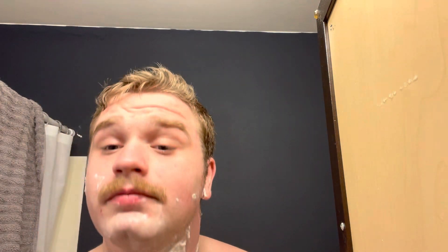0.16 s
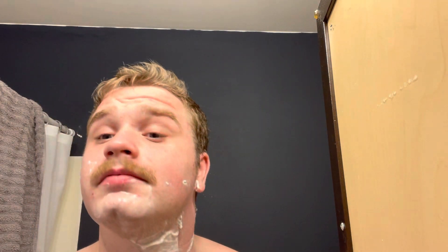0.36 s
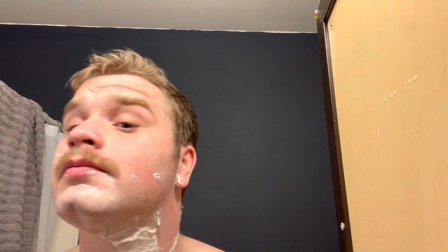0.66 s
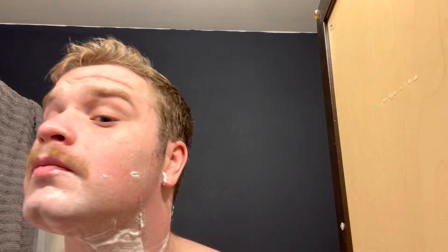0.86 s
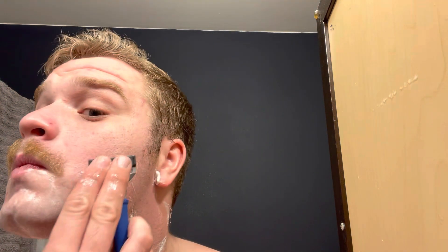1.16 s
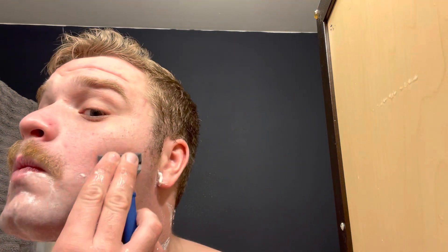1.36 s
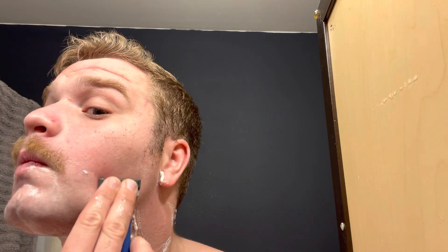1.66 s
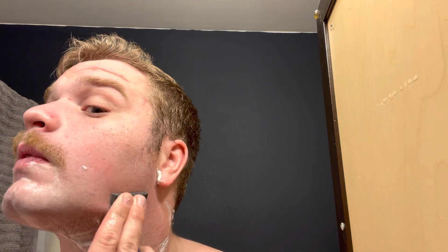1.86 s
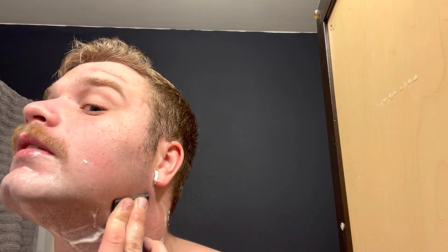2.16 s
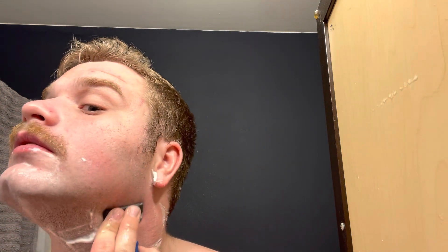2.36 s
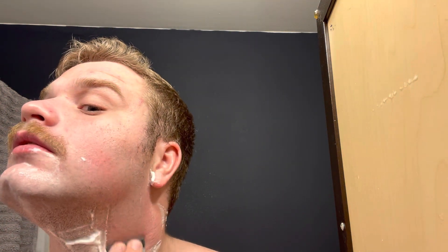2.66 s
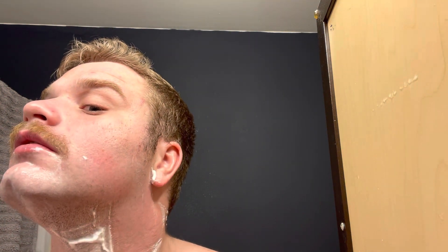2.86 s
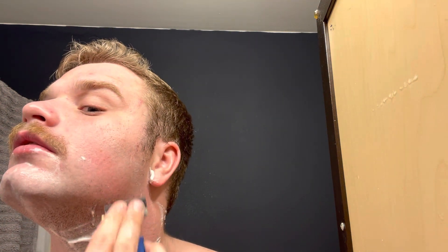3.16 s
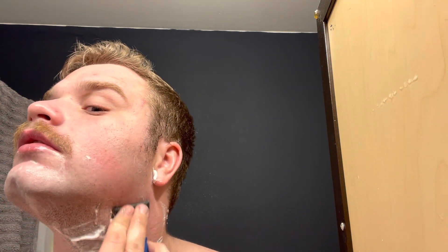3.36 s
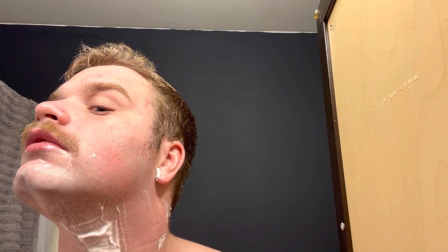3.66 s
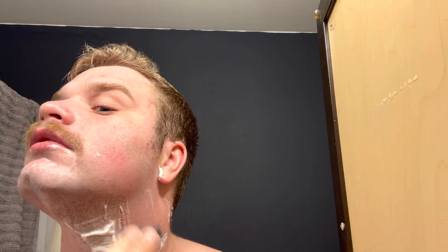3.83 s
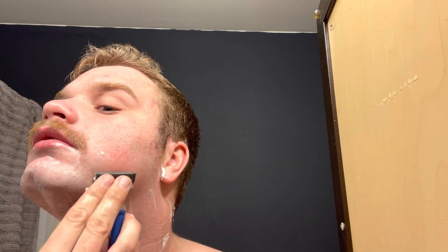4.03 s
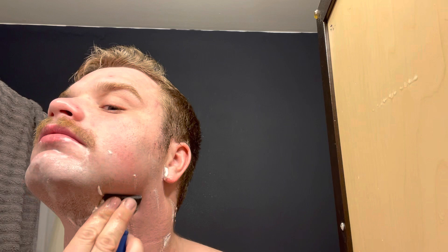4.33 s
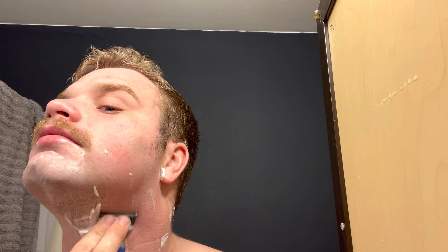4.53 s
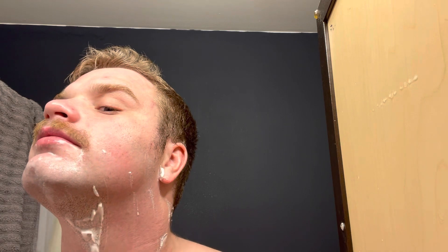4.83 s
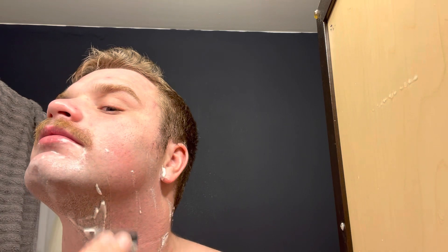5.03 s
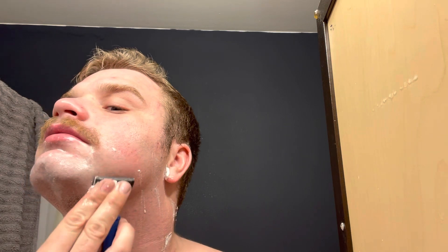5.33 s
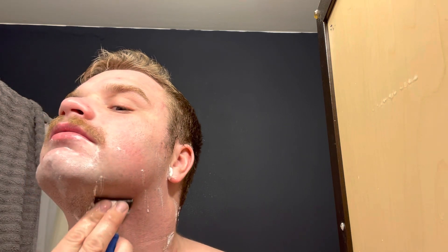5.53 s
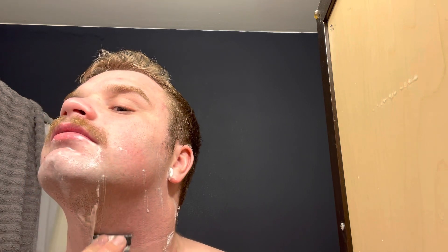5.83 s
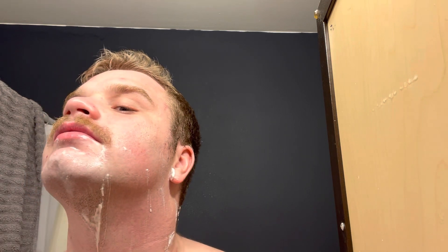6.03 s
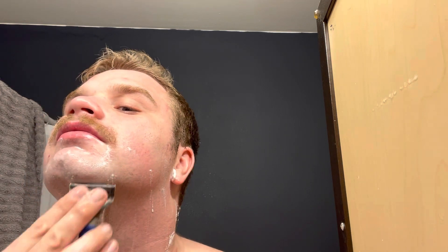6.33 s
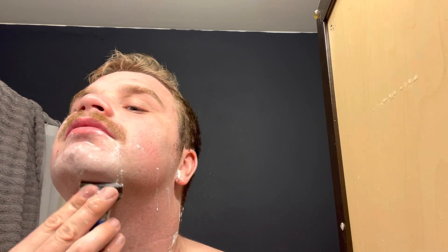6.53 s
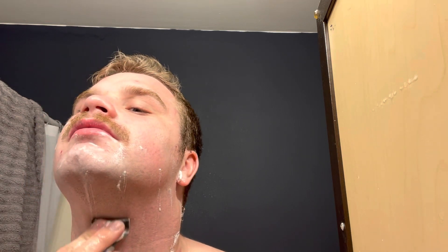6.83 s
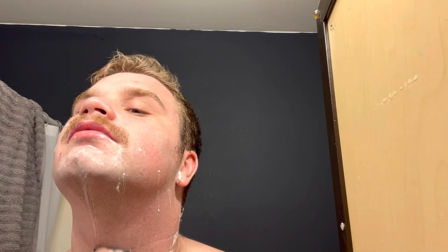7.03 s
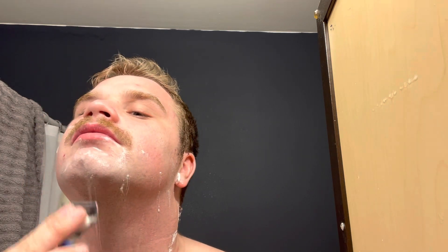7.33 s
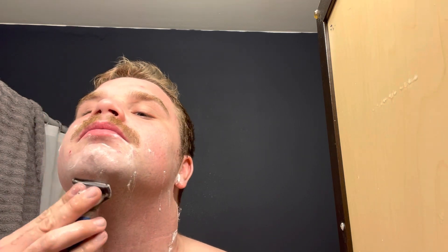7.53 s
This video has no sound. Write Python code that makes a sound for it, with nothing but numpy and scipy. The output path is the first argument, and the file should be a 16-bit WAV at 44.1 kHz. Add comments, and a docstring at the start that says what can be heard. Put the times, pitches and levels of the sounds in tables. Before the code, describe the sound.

An extractor fan hums low and steady in a small bathroom. Shaving foam fizzes and ticks very faintly, then a hand razor makes seven separate strokes through stubble, each a crisp crackle with skin drag and a wet squelch of lather. Tiny clicks come now and then. Near the end, soft hand bumps and two dull, deep thumps precede one short last stroke. The microphone is close and stereo.

```python
"""Wet shave in a small bathroom, close stereo microphone; an extractor fan hums throughout.
First, fresh foam fizzes and ticks. From 1.4 s, seven razor strokes: hairs snap in a dense crackle,
the head drags on the skin, lather squelches; foam and cartridge tick now and then.
The blades zing in the fourth stroke; near 6 s the head flicks off the skin and rings.
Soft hand bumps follow from 6.6 s, then two dull arm thumps before the short last stroke."""
import sys
import numpy as np
from scipy import signal
from scipy.fft import rfft, irfft, next_fast_len
from scipy.io import wavfile

SR = 44100
rng = np.random.default_rng(int(sys.argv[2]) if len(sys.argv) > 2 else 0)


def master(y):
    """Save y as 16-bit WAV."""
    cut = np.clip(np.atleast_2d(y).T, -1, 1)
    pcm = np.round(cut * 32767)  # scale
    wavfile.write(sys.argv[1], SR, pcm.astype(np.int16))


N = 339129
TIME_S = np.arange(N) / SR
N_FFT = next_fast_len(N + SR)
FREQS_HZ = np.maximum(np.arange(N_FFT // 2 + 1) * SR / N_FFT, 1)
FIELDS = 3  # sound fields: shared, left only, right only


def razor(fine_db=-1.0, coarse_db=-3.0, drag_db=6.5, lather_db=-0.5, judder_db=1.9, judder_hz=85):
    """Blades cut fine and coarse hairs; the head catches and slips, shaking all contacts together."""
    # spectra of stubble, coarse hairs, skin drag and wet lather: freq_hz, density_db
    fine_spectrum = [(2500, -16), (3700, -15), (4300, 1), (5400, 0), (6500, -1.5), (7500, 1.5), (9000, -8),
                     (12000, -10)]
    coarse_spectrum = [(1600, -15.5), (1950, -8), (2250, -6.5), (2550, 3.5), (2950, -2.5), (3400, -1.5),
                       (3900, -4.5), (5500, -7), (9000, -37.5)]
    drag_spectrum = [(130, -17), (260, -11), (500, -1), (780, 0), (1120, -2), (1380, -7), (1700, -7.5),
                     (2400, -21)]
    lather_spectrum = [(5000, -7), (7000, -6), (8800, -10.5), (10500, 2.5), (12500, -5.5), (15000, -16)]
    fine, coarse, drag, lather = stroke_gains()
    lather = np.maximum(lather, settling(lather))
    cutting = from_db(fine_db) * fine * colour(snaps(per_s=4200, spread_db=4), fine_spectrum)
    tugging = from_db(coarse_db) * coarse * colour(snaps(per_s=1400, spread_db=3), coarse_spectrum)
    rubbing = from_db(drag_db) * drag * colour(snaps(per_s=4000, spread_db=0.5), drag_spectrum)
    squelch = from_db(lather_db) * lather * colour(snaps(per_s=4100, spread_db=3), lather_spectrum)
    contacts = cutting + tugging + rubbing + squelch + zing()
    judder = unit_rms(resonate(drift(2 * judder_hz), judder_hz, judder_hz))
    return contacts * from_db(judder_db * judder)


def stroke_gains(touch_db=-23, rest_db=-21.5, land_db_per_s=87.5, lift_db_per_s=480, heap_db=7):
    """Gains of fine hairs, coarse hairs, drag and lather as the head lands, rests, pulls and lifts."""
    # razor strokes, coarse and drag relative to fine stubble: start_s, lift_s, attack_s,
    # fine_start_db, fine_lift_db, coarse_db, drag_start_db, drag_lift_db, wet_db, rest_s
    strokes = [(1.438, 1.888, 0.032, -68.5, -76.5, 0.5, -16.5, 4, 0, .06),
               (1.983, 2.808, 0.1, -70, -50.5, 1.5, -8, -10, 1.5, .1),
               (3.298, 3.636, 0.069, -61, -54, -7, -10.5, 0.5, -2, 0.049),
               (4.178, 4.825, 0.072, -59.5, -49, -4.5, -10.5, -7, -6, 0.062),
               (5.387, 6.008, 0.061, -57, -65, -9.5, -5, 4, 0.5, 0.14),
               (6.542, 7.081, 0.061, -50, -65.5, -6.5, -5, -1.5, -2.5, 0.23),
               (7.585, 7.733, 0.067, -52.5, -54.5, -9.5, -9, -7.5, -1, 0.11)]
    # dense stubble where the blades bite harder: time_s, rise_db, half_length_s
    patches = [(1.489, 11.5, 0.11), (1.807, 7.5, 0.05), (2.012, 7, 0.035), (2.191, 13, 0.024),
               (2.51, 8, 0.064), (2.666, 6.5, .06), (3.313, 11, 0.01), (3.408, 5, 0.032), (3.553, 3.5, .03),
               (3.634, 5, 0.0061), (4.287, 9, 0.044), (4.832, 6.5, 0.0094), (5.426, 4.5, 0.022),
               (5.966, 20, 0.036), (6.653, 4, .04), (7.016, 7, 0.055)]
    bite_db = sum(rise_db * bell(time_s, half_s) for time_s, rise_db, half_s in patches)
    gains = np.zeros((4, N))
    for start_s, lift_s, attack_s, *levels_db, rest_s in strokes:
        fine_start_db, fine_lift_db, coarse_db, drag_start_db, drag_lift_db, wet_db = levels_db
        along = np.clip((TIME_S - start_s) / (lift_s - start_s), 0, 1)
        pull_db = np.maximum(touch_db * np.maximum(start_s - TIME_S, 0) / attack_s, rest_db)
        off_skin_db = land_db_per_s * np.maximum(start_s - rest_s - TIME_S, 0)
        off_skin_db += lift_db_per_s * np.maximum(TIME_S - lift_s, 0)
        pressure_db = pull_db - off_skin_db + fine_start_db + along * (fine_lift_db - fine_start_db)
        fine_db = pressure_db + bite_db
        drag_db = pressure_db + 0.57 * bite_db + drag_start_db + along * (drag_lift_db - drag_start_db)
        # lather is torn by both cut and drag, and heaps up ahead of the blades
        lather_db = (fine_db + drag_db) / 2 + wet_db + heap_db * (along - 0.5)
        on = off_skin_db < 60
        gains[:, on] += from_db([fine_db[on], fine_db[on] + coarse_db, drag_db[on], lather_db[on]])
    return gains


def settling(lather, stirred_db=-18.5, fall_db_per_s=74):
    """Gain of stirred lather, crackling on after the head has passed."""
    fall_db = fall_db_per_s * TIME_S
    held_db = np.maximum.accumulate(20 * np.log10(lather + 1e-9) + fall_db) - fall_db
    return from_db(held_db + stirred_db)


def razor_head(x, gain_db=-1.13, sway_db=2.2, sway_hz=2):
    """The hollow cartridge rings and swallows pitches in between; each mode sways as the head tilts."""
    # dips between modes: freq_hz, width_hz, depth_db
    hollows = [(1570, 250, -5), (2520, 160, -6), (3520, 120, -3)]
    # cartridge modes: freq_hz, width_hz, gain_db
    modes = [(2110, 120, 5), (2320, 110, 7.5), (2800, 170, 2), (2990, 150, 0.5), (3720, 140, 0),
             (4720, 130, -3), (5300, 150, 1.5), (5700, 160, -4), (6250, 300, -4), (8200, 300, -1)]
    for hz, width_hz, db in hollows:
        x = x - (1 - from_db(db)) * resonate(x, hz, width_hz)
    rings = sum(from_db(db + sway_db * drift(sway_hz)) * resonate(x, hz, width_hz)
                for hz, width_hz, db in modes)
    return from_db(gain_db) * (x + rings)


def thick_hairs(gain_db=1.5, ring_hz=3500, width_hz=2400):
    """Single thick hairs give way, each a sharp click with the broad colour of the head."""
    # hair snaps: time_s, level_db
    hairs = [(2.5128, -32), (2.6825, -25), (2.699, -25), (2.7289, -23), (2.7328, -23), (4.2447, -40),
             (4.4109, -39), (4.564, -35), (4.8342, -34), (6.565, -35), (6.608, -33), (6.666, -34)]
    clicks = np.zeros((FIELDS, N))
    for time_s, db in hairs:
        clicks[:, round(time_s * SR)] = from_db(db + gain_db) * rng.choice([-1, 1], FIELDS)
    click_peak = resonate(signal.unit_impulse(SR // 100), ring_hz, width_hz).max()
    return resonate(clicks, ring_hz, width_hz) / click_peak


def zing(start_s=4.25, length_s=0.41, edge_s=0.023, level_db=-57, ring_hz=6850, width_hz=900):
    """The blades ring on the long stroke down the neck."""
    end_s = start_s + length_s
    gate = np.interp(TIME_S, [start_s - edge_s, start_s, end_s, end_s + edge_s], [0, 1, 1, 0])
    ring = resonate(snaps(per_s=2700, spread_db=3), ring_hz, width_hz)
    return from_db(level_db) * gate * unit_rms(ring)


def flick(time_s=5.968, half_length_s=0.02, level_db=-49.5, modes_hz=(2320, 3700, 6150), width_hz=140):
    """Leaving the skin, the cartridge is undamped and the last hairs set it ringing."""
    hairs = snaps(per_s=3600, spread_db=6)
    ring = sum(resonate(hairs, hz, width_hz) for hz in modes_hz)
    return from_db(level_db) * bell(time_s, half_length_s) * unit_rms(ring)


def ticks():
    """Foam and cartridge tick finely; a light touch of the blades is a duller, wider click."""
    # foam and cartridge ticks: time_s, peak_db, ring_hz, width_hz
    fine_ticks = [(0.155, -52.5, 5270, 1520), (0.323, -51, 5280, 1200), (0.442, -47, 11050, 1400),
                  (0.52, -50.5, 7030, 500), (0.673, -53, 6900, 2000), (1.352, -50.5, 4950, 2200),
                  (2.363, -33.5, 8440, 3500), (3.085, -47, 10900, 3000), (4.194, -45, 11100, 1500),
                  (4.774, -28.5, 9100, 3500), (5.812, -38, 8300, 3500), (6.246, -48, 8500, 3000),
                  (6.43, -26.5, 9100, 3500), (6.938, -33.5, 7800, 3500)]
    # blades touching skin between strokes: time_s, peak_db, ring_hz
    touches = [(0.635, -53, 1300), (3.217, -61, 2400), (4.016, -58, 4500), (5.208, -53, 6000),
               (5.278, -55, 3300), (5.324, -58, 4000), (7.127, -53, 3800)]
    out = np.zeros((FIELDS, N))
    for time_s, db, hz, width_hz in fine_ticks:
        add_at(out, time_s, from_db(db) * crack(hz, width_hz, decay_s=0.0015))
    for time_s, db, hz in touches:
        add_at(out, time_s, from_db(db) * crack(hz, width_hz=3500, decay_s=0.0014))
    return out


def crack(hz, width_hz, decay_s):
    """A short noise burst through one broad ring; peak 1."""
    age_s = TIME_S[:SR // 50]
    burst = rng.standard_normal((FIELDS, len(age_s))) * np.exp(-age_s / decay_s)
    ring = resonate(resonate(burst, hz, width_hz), hz, max(hz, width_hz))
    return ring / np.abs(ring).max()


def foam(floor_db=-83.5, fresh_db=12, fresh_s=1.45, clump_db=1.8, clump_hz=5):
    """Tiny bubbles burst in clumps, most while the foam is fresh."""
    # bubble fizz: freq_hz, density_db
    spectrum = [(1200, -9), (2500, -6), (6500, -5), (8800, -8), (11000, 0), (13500, -3)]
    level_db = floor_db + fresh_db * bell(0, fresh_s) + clump_db * drift(clump_hz)
    return from_db(level_db) * colour(snaps(per_s=3000, spread_db=2.5), spectrum)


def hand_bumps(rise_s=0.0024, relative_width=0.85):
    """Flesh meets something firm: a soft puff that swells and dies."""
    # bumps and brushes of the hand: time_s, level_db, centre_hz, length_s
    bumps = [(6.625, -48, 260, 0.1), (6.918, -42.5, 245, 0.022), (7.366, -61.5, 600, 0.19),
             (7.433, -46, 520, 0.027), (7.435, -59, 5500, 0.025)]
    out = np.zeros((FIELDS, N))
    age_s = TIME_S[:SR // 5]
    for time_s, db, hz, length_s in bumps:
        noise = rng.standard_normal((FIELDS, len(age_s)))
        thud = resonate(resonate(noise, hz, hz * relative_width), hz, 2 * hz)
        swell = (1 - np.exp(-age_s / rise_s)) * np.exp(-(age_s / length_s) ** 2 / 2)
        add_at(out, time_s, from_db(db) * unit_rms(thud) * swell)
    return out


def arm_thumps(centre_hz=36.2):
    """The arm pushes the air once and it swings back; mono."""
    # pushes of air: time_s, peak_db
    thumps = [(7.413, -42), (7.457, -36.5)]
    out = np.zeros(N)
    for time_s, db in thumps:
        swing = (np.pi * centre_hz * (TIME_S - time_s)) ** 2
        out += from_db(db) * (1 - 2 * swing) * np.exp(-swing)
    return out


def fan_hum(waver_rad=0.017, main_hz=120, waver_hz=1.6, left_over_right_db=-2.0):
    """Close motor lines beat against each other; the higher ones waver more."""
    # mains orders and their shaft-rate sidebands: freq_hz, level_db
    lines = [(56.76, -55.5), (113.51, -56.5), (116.79, -65.5), (120.03, -32), (176.79, -61.5),
             (180.05, -64), (183.31, -55.5), (220.08, -65), (240.06, -54), (360.09, -68), (423.37, -64),
             (480.12, -69.5), (543.38, -70.5)]
    out = np.zeros(N)
    wander_rad = waver_rad * drift(waver_hz)
    for hz, db in lines:
        phase = 2 * np.pi * (hz * TIME_S + rng.random()) + wander_rad * hz / main_hz
        out += np.sqrt(2) * from_db(db) * np.sin(phase)
    return out * from_db(left_over_right_db * np.array([[0.5], [-0.5]]))


def fan_air(level_db=-45, cutoff_hz=615):
    """Air rushes dully through the fan housing."""
    # air rush: freq_hz, density_db
    spectrum = [(20, -19.5), (40, -15), (65, -9), (90, -13), (150, -5.5), (195, -13.5), (260, -10.5),
                (350, -12), (400, -18), (520, -16), (660, -23.5)]
    rush = from_db(level_db) * colour(rng.standard_normal((FIELDS, N)), spectrum)
    return signal.sosfilt(signal.butter(5, cutoff_hz, fs=SR, output="sos"), rush)


def faint_hiss(level_db=-81.5):
    """A faint steady hiss."""
    # hiss: freq_hz, density_db
    spectrum = [(600, -3), (1150, 2), (2000, -3), (4500, -11), (13000, -10)]
    return from_db(level_db) * colour(rng.standard_normal((FIELDS, N)), spectrum)


def bathroom(fields, echo_db, echo_t60_s=0.06, tail_db=-12, tail_t60_s=0.25, gap_s=0.003):
    """Each field gets quick echoes off mirror and walls, and a faint tail."""
    age_s = TIME_S[:SR // 2]
    response = 0
    for t60_s, db in ((echo_t60_s, echo_db), (tail_t60_s, tail_db)):
        decay = rng.standard_normal((FIELDS, len(age_s))) * from_db(-60 * age_s / t60_s) * (age_s > gap_s)
        response += from_db(db) * decay / np.linalg.norm(decay, axis=1, keepdims=True)
    return fields + irfft(rfft(fields, N_FFT) * rfft(response, N_FFT), N_FFT)[:, :N]


def microphone(fields):
    """Two ports mix the shared field with their own; level, phase and coherence vary with frequency."""
    # stereo pair: freq_hz, left_over_right_db, left_lead_rad, coherence
    ports = [(100, -1, 0.1, 1.0), (300, -5, 0.1, 0.82), (520, -7, 0.6, 0.13), (700, -1, 2.3, 0.61),
             (1050, 6, 2.3, 0.71), (1350, 2, 2.1, 0.18), (1600, -1, -0.6, 0.15), (2200, -3, -0.3, 0.77),
             (2600, -3, 1.7, 0.49), (3050, 11, 1.6, 0.43), (3750, 2, -0.1, 0.69), (4600, 1, -1.1, 0.51),
             (5700, 6, -0.2, 0.26), (6500, 3, -0.7, 0.2), (7400, 2, 2.2, 0.54), (8500, 0, 3.1, 0.95),
             (9500, 0, 3.2, 0.94), (10300, 0, 4.8, 0.63), (11100, 0, 6.2, 0.96), (12200, 0, 6.3, 0.96),
             (12900, 0, 7.4, 0.46)]
    balance_db, lead_rad, coherence = (at_freqs(ports, column) for column in (1, 2, 3))
    shared, *own = rfft(fields, N_FFT)
    phase_shift = np.exp(np.outer([0.5j, -0.5j], lead_rad))
    pair = np.sqrt(coherence) * shared * phase_shift + np.sqrt(1 - coherence) * np.array(own)
    gains = from_db(np.outer([0.5, -0.5], balance_db))
    gains /= np.sqrt(np.mean(gains ** 2, axis=0))
    return irfft(pair * gains, N_FFT)[:, :N]


def snaps(per_s, spread_db):
    """Random clicks, most small, a few large; random sign in each field."""
    sizes = from_db(spread_db * np.minimum(rng.exponential(1, N), 4.5))
    hits = rng.random(N) < per_s / SR
    return sizes * hits * rng.choice([-1, 1], (FIELDS, N))


def resonate(x, hz, width_hz):
    """Two-pole resonance; peak gain 1."""
    radius = np.exp(-np.pi * width_hz / SR)
    feedback = [1, -2 * radius * np.cos(2 * np.pi * hz / SR), radius ** 2]
    return signal.lfilter(np.array([1, 0, -1]) * (1 - radius ** 2) / 2, feedback, x)


def colour(x, spectrum):
    """Filter x by a spectrum table; rms 1."""
    return unit_rms(irfft(rfft(x, N_FFT) * from_db(at_freqs(spectrum)), N_FFT)[..., :N])


def drift(rate_hz):
    """Smooth random wander, mostly below rate_hz; rms 1."""
    noise = rfft(rng.standard_normal(N_FFT))
    return unit_rms(irfft(noise / (1 + (FREQS_HZ / rate_hz) ** 2), N_FFT)[:N])


def at_freqs(table, column=1):
    """A table column interpolated over log frequency."""
    rows = np.array(table)
    return np.interp(np.log(FREQS_HZ), np.log(rows[:, 0]), rows[:, column])


def bell(centre_s, half_length_s):
    return np.exp(-((TIME_S - centre_s) / half_length_s) ** 2)


def add_at(out, start_s, sound):
    out[:, round(start_s * SR):][:, :sound.shape[1]] += sound


def from_db(db):
    return 10 ** (np.asarray(db) / 20)


def unit_rms(x):
    return x / np.sqrt(np.mean(x ** 2) + 1e-20)


def scene():
    """Shaving in the room, over the fan's air and hum."""
    shave = razor_head(razor() + thick_hairs()) + flick() + foam() + hand_bumps()
    in_room = bathroom(shave, echo_db=-4) + bathroom(ticks(), echo_db=-6)
    background = faint_hiss() + fan_air()
    return microphone(in_room + background) + fan_hum() + arm_thumps()


def record(dry):
    """Steep low-pass at 13.5 kHz."""
    return signal.sosfilt(signal.ellip(10, 0.1, 80, 13500, fs=SR, output="sos"), dry)


dry = scene()
out = record(dry)
master(out)
```